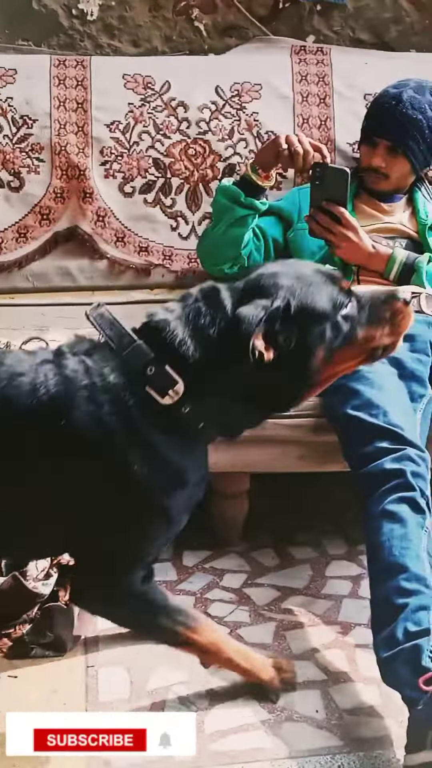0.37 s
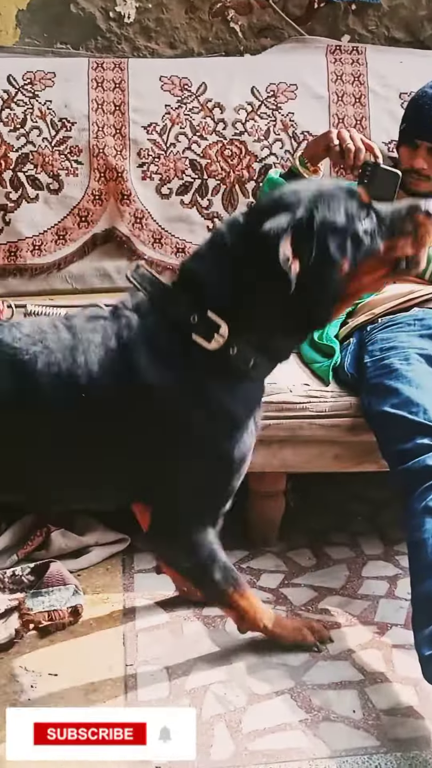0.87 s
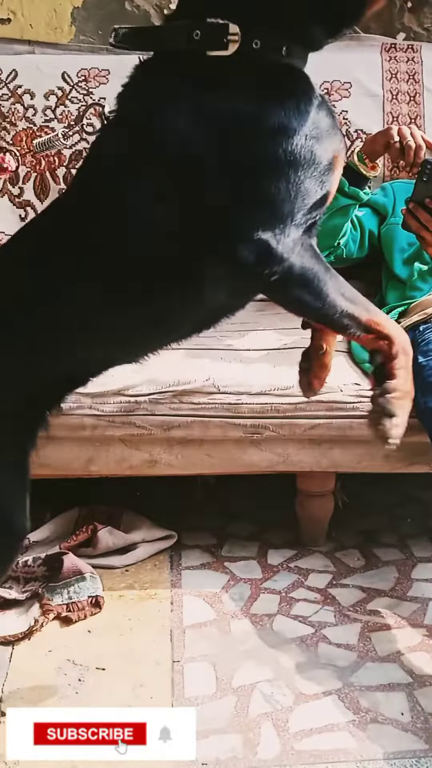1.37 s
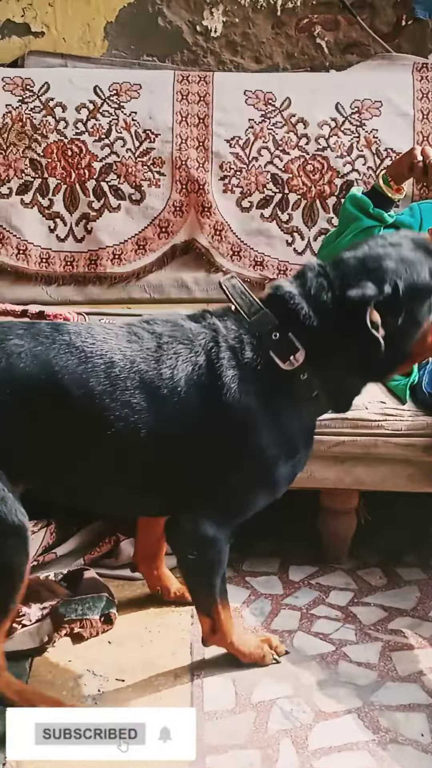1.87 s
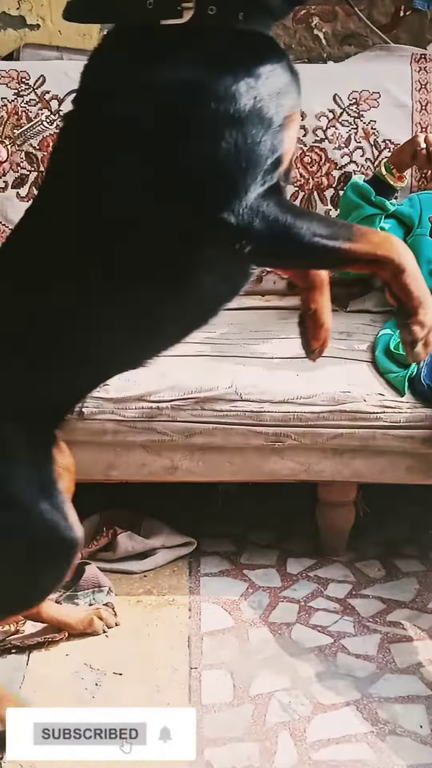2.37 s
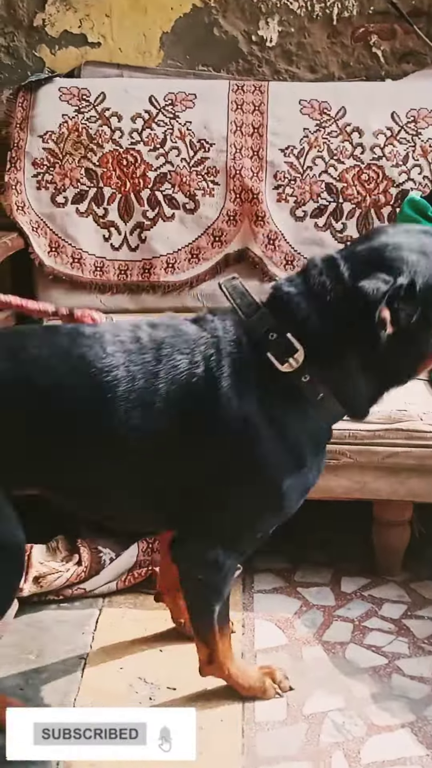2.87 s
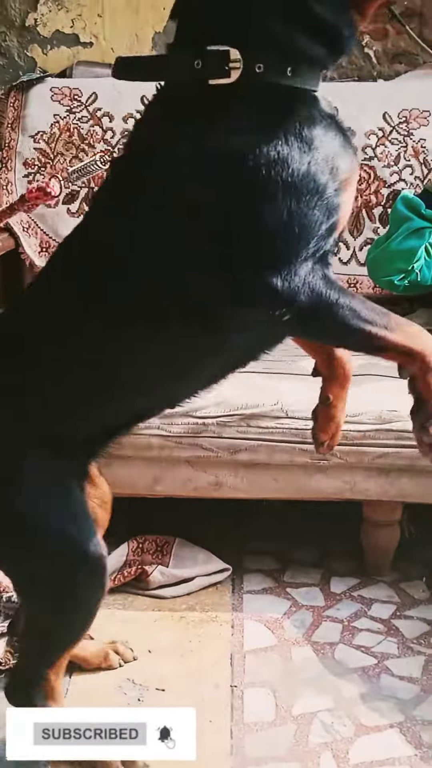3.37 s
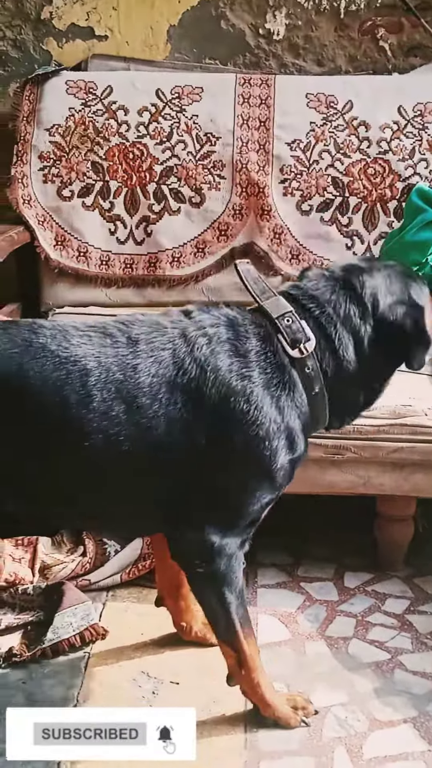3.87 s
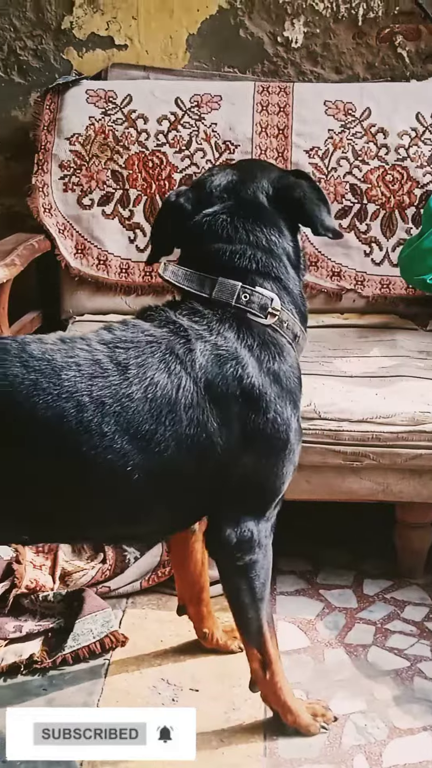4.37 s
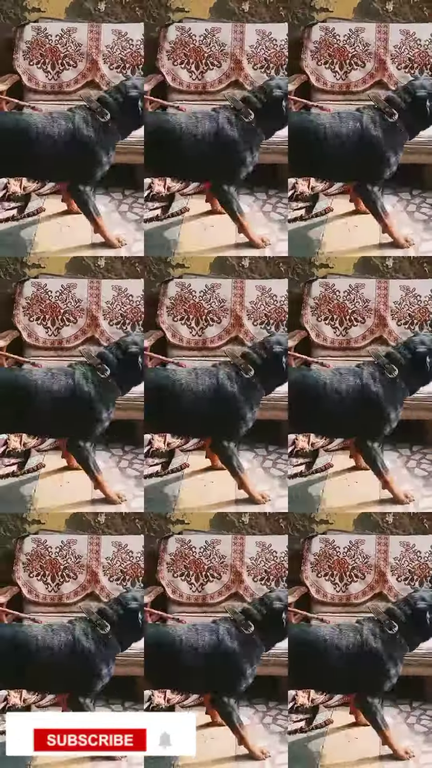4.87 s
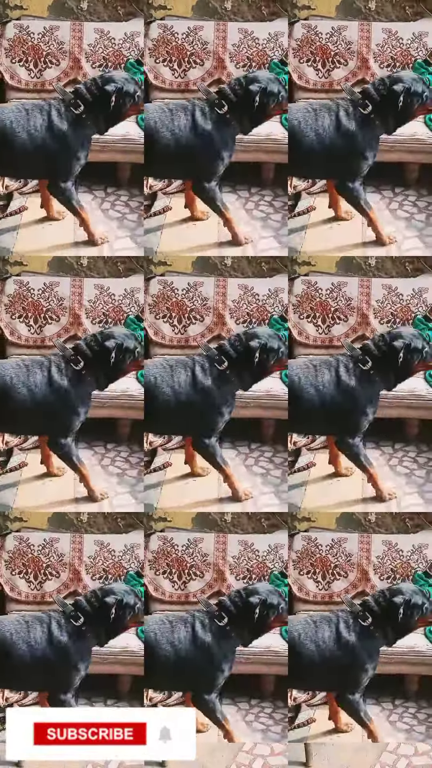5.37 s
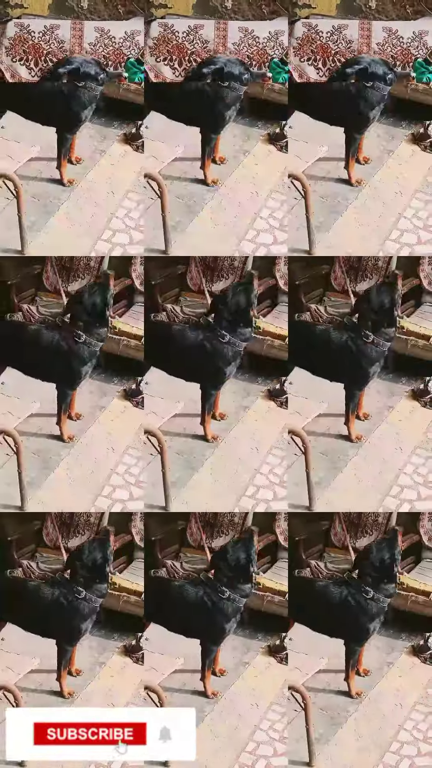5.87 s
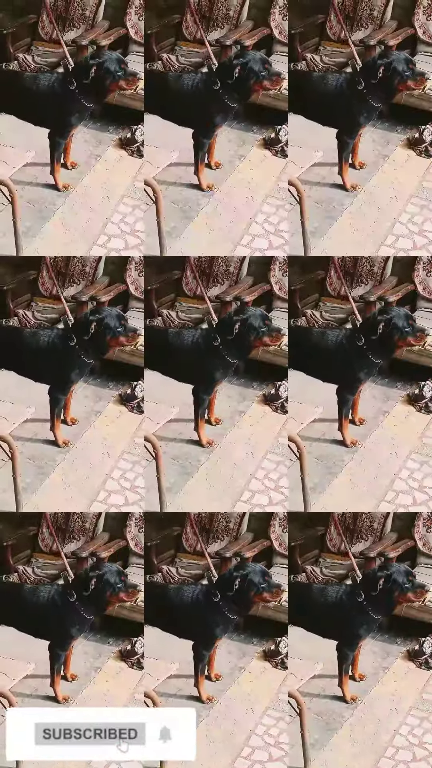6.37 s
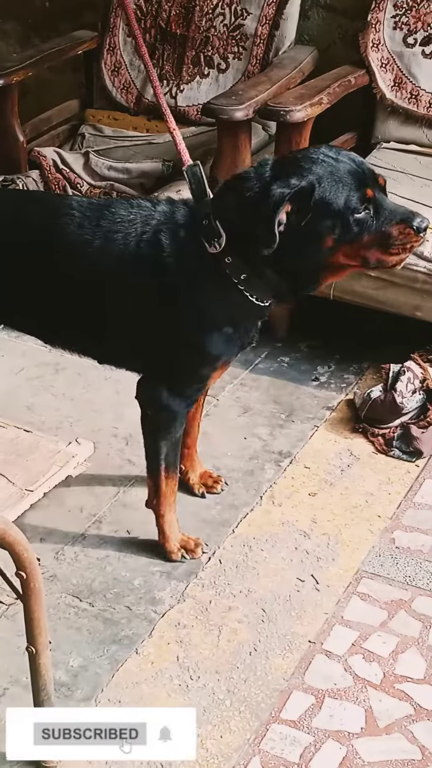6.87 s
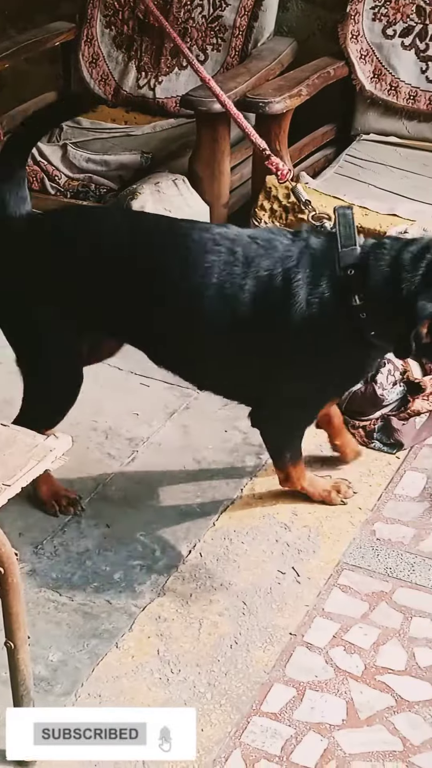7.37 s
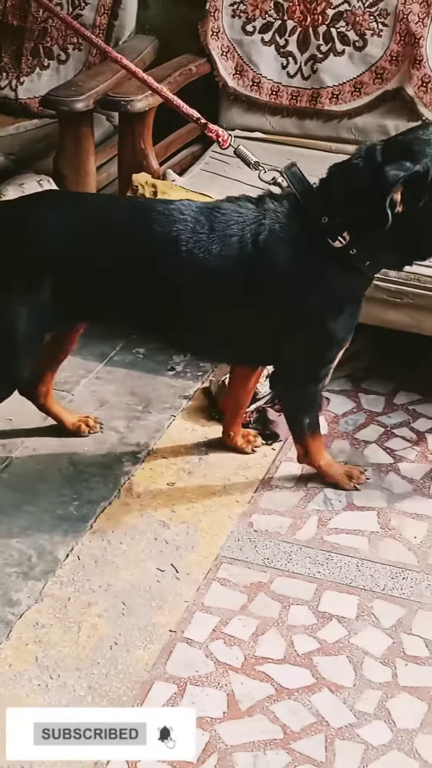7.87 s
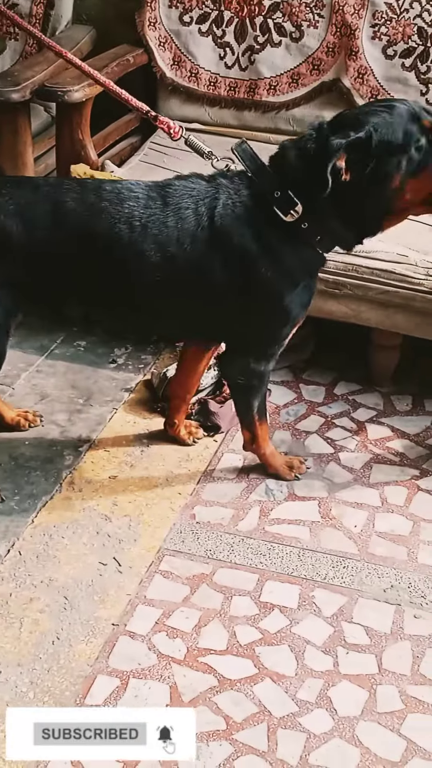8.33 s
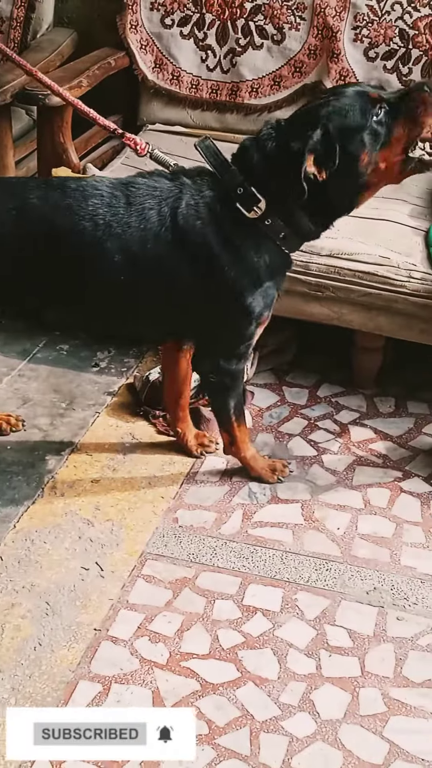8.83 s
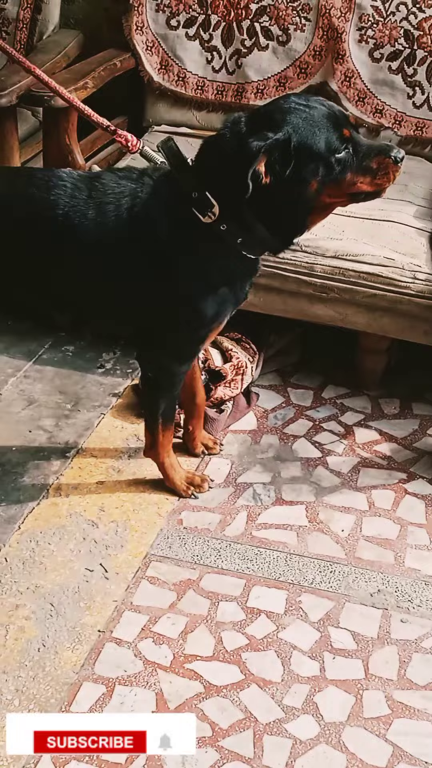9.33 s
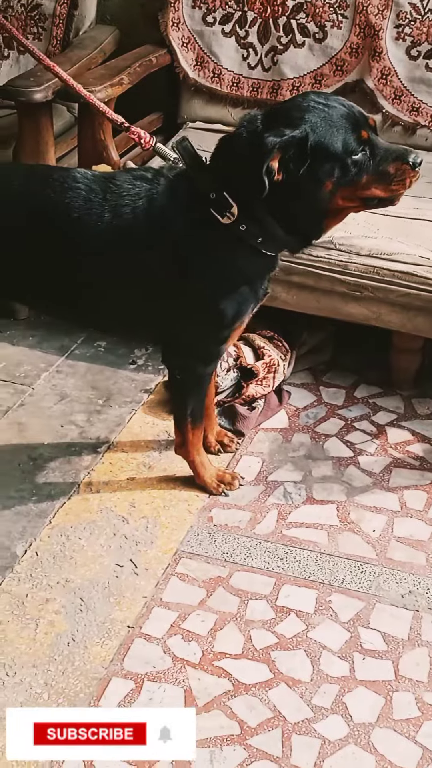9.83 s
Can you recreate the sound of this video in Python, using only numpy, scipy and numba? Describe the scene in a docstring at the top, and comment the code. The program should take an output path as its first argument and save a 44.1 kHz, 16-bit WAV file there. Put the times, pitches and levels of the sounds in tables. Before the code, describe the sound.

A large dog barks hoarsely in rapid runs, growling low between barks while its lead clip rattles in a hard-walled courtyard.

```python
"""Dog barking in a walled yard

A large dog on a lead barks in runs and growls low between the barks, over quiet outdoor air and far chirps.
Rough vocal pulses ring moving throat resonances, and breath hisses past the teeth.
The metal clip of the lead rattles in dying bursts of contacts, paws land on stone as dull puffs of noise,
and the walls answer with single echoes and scattered tails."""
import sys
import numpy as np
from scipy import signal
from scipy.fft import rfft, irfft
from scipy.io import wavfile
from scipy.ndimage import uniform_filter1d, minimum_filter1d
from numba import njit

SR = 44100
rng = np.random.default_rng(int(sys.argv[2]) if len(sys.argv) > 2 else 0)


def to_wav(s):
    """Save 16-bit WAV."""
    ch = np.atleast_2d(s).T  # columns
    pcm = np.round(np.clip(ch, -1, 1) * 32767)  # PCM
    wavfile.write(sys.argv[1], SR, pcm.astype(np.int16))


def level_to_linear(level):
    """Convert decibel levels to linear amplitude factors, elementwise."""
    exponent = np.asarray(level, float) / 20
    return 10 ** exponent


N = 439677   # length in samples


def rms_one(x):
    """Power normalisation: scale to unit rms."""
    return x / np.sqrt(np.mean(x ** 2) + 1e-20)


def evened(x, window=.025):
    """Envelope flattening: bring the short-time rms, over a window in s, to 1."""
    return x / np.sqrt(uniform_filter1d(x ** 2, int(window * SR)) + 1e-12)


def drift(hz):
    """Low-passed chance: slow random motion of unit spread, drawn at every tenth sample."""
    r = np.exp(-20 * np.pi * hz / SR)
    settling = 2000
    draws = rng.standard_normal(N // 10 + settling + 2)
    slow = signal.lfilter([1], [1, -2 * r, r * r], draws)[settling:]
    return np.interp(np.arange(N) / 10, np.arange(len(slow)), rms_one(slow))


def filtered(x, order, hz, kind="low"):
    """Butterworth filtering: a flat passband and a smooth roll-off."""
    return signal.sosfilt(signal.butter(order, hz, kind, fs=SR, output="sos"), x)


@njit
def resonate(x, cosine, r):
    """Two-pole resonance of gain 1 whose centre and width may move sample by sample."""
    y = np.zeros(len(x))
    for i in range(2, len(x)):
        drive = (1 - r[i] ** 2) / 2 * (x[i] - x[i - 2])
        y[i] = drive + 2 * r[i] * cosine[i] * y[i - 1] - r[i] ** 2 * y[i - 2]
    return y


def resonance(x, hz, *widths_hz):
    """Resonance at a fixed or moving frequency: one pass in series for each width."""
    ones = np.ones(len(x))
    for width_hz in widths_hz:
        x = resonate(x + 1e-18, np.cos(2 * np.pi * hz / SR) * ones, np.exp(-np.pi * width_hz / SR) * ones)
    return x


def coloured(spectrum):
    """Spectral shaping: noise with the given spectrum, rms 1."""
    hz, db = np.transpose(spectrum)
    bins = np.fft.rfftfreq(N, 1 / SR) + 1
    gain = level_to_linear(np.interp(np.log(bins), np.log(hz), db))
    return rms_one(irfft(rfft(rng.standard_normal(N)) * gain, N))


def latest(rows, *lists):
    """Event lookup: time since the latest event began, and the columns of that event."""
    table = np.column_stack([rows, *lists])
    t = np.arange(N) / SR
    columns = table[np.maximum(np.searchsorted(table[:, 0], t) - 1, 0)].T
    return np.maximum(t - columns[0], 0), columns[1:]


def in_time(rows):
    """Linear interpolation: columns joined by straight lines in time."""
    s, *columns = np.transpose(rows)
    return [np.interp(np.arange(N) / SR, s, c) for c in columns]


# spectrum of the outdoor air: frequency_hz, relative_db
AIR_SPECTRUM = [(24, -38.5), (40, -18), (75, 4), (154, 1), (606, -9), (1820, -15.5), (2500, -27.5),
                (3100, -19), (3700, -22.5), (7000, -18.5), (9000, -27.5), (13000, -27.5), (15500, -16.5)]


def outdoor_air():
    """Air absorption: steady coloured noise, dulled by distance."""
    return filtered(level_to_linear(-65.5) * coloured(AIR_SPECTRUM), 2, 5500)


# faint far chirps: start_s, length_s, pitch_hz, level_db
FAR_CHIRPS = [(3.3, 0.25, 2680, -74), (5.193, 0.14, 1810, -59), (5.2, 0.11, 2170, -67),
              (5.207, .08, 3000, -69), (6.765, 0.24, 3055, -85), (9.328, 0.41, 3136, -81),
              (9.55, 0.25, 2150, -80.5), (9.771, 0.17, 3130, -79.5)]


def chirps():
    """Narrow-band noise: thin wavering whistles from far off, each under a half-sine swell."""
    out, t, noise = 0, np.arange(N) / SR, rng.standard_normal(N)
    for start, length, hz, db in FAR_CHIRPS:
        whistle = rms_one(resonance(noise, hz, 64, 64))
        out = out + level_to_linear(db) * np.sin(np.pi * np.clip((t - start) / length, 0, 1)) * whistle
    return out


# single reflections from the walls: delay_s, level_db
ECHOES = [(0.037, -11), (0.069, -23), (0.12, -23), (.16, -21)]
# scattered tails, near walls then far buildings: t60_s, level_db, dulled_above_hz
TAILS = [(0.421, -5.5, 3000), (1.496, -28, 1133)]


def yard(x):
    """Reverberation as convolution: a few single echoes, then two dull tails of scattered reflections."""
    t = np.arange(2 * SR) / SR
    answer = np.zeros(len(t))
    for delay, db in ECHOES:
        answer[round(delay * SR)] = level_to_linear(db)
    answer = signal.lfilter([.5], [1, -.5], answer)   # the echoes lose treble
    for t60, db, dull_hz in TAILS:
        build_up = 1 - np.exp(-t / 0.00073)
        tail = filtered(rng.standard_normal(len(t)) * level_to_linear(-60 * t / t60) * build_up, 1, dull_hz)
        answer += level_to_linear(db) * tail / np.sqrt(np.sum(tail ** 2))   # level set by energy
    return signal.fftconvolve(x, answer)[:N]


# paws on stone: start_s, level_db, centre_hz
PAW_STEPS = [(3.339, -58, 382.9), (3.433, -50.5, 367.3), (3.532, -50.5, 372), (8.115, -63, 324),
             (9.76, -66, 312)]


def paws():
    """Damped impact: a soft pad gives a short dull puff of noise."""
    out, t = np.zeros(N + SR), np.arange(SR // 4) / SR
    for start, db, hz in PAW_STEPS:
        puff = rms_one(resonance(rng.standard_normal(len(t)), hz, 140, 300))
        envelope = level_to_linear(db - 60 * t / 0.29) * np.clip(t / 0.0012, 0, 1)
        out[round(start * SR):][:len(t)] += envelope * puff
    return out[:N]


KNOCKS = [(0.4664, -29.5, 0.14), (1.576, -41.5, 0.11), (1.595, -49, 0.11), (1.634, -30, 0.27),
          (1.7518, -35.5, 0.067), (1.757, -34.5, 0.089), (2.476, -33, 0.13), (2.786, -35, 0.063),
          (2.8077, -24, 0.05), (2.837, -36, 0.08), (3.076, -39.5, 0.068), (3.094, -48, 0.2),
          (3.12, -53.5, .05), (3.168, -47, 0.045), (3.432, -51, 0.1), (3.457, -53.5, 0.1),
          (3.487, -52, .08), (3.533, -48, 0.31), (3.619, -38.5, 0.044), (3.6839, -46, 0.094),
          (4.989, -33.5, 0.09), (5.2, -59, 0.56), (5.259, -62.5, 0.11), (7.412, -45, 0.2),
          (7.496, -44, 0.17), (7.5993, -44, 0.083)]
CLIP_RINGS = [(2150, 1200, -7), (3800, 1400, -5.5), (5800, 950, 2), (6730, 110, 1.5), (8800, 700, -12.5)]


def lead_clip():
    """Modal excitation: each knock is a dying burst of tiny contacts through the broad clip resonances."""
    shape, t = np.zeros(N + SR), np.arange(SR // 2) / SR
    for start, db, t60 in KNOCKS:
        shape[round(start * SR):][:len(t)] += level_to_linear(db - 60 * t / t60) * np.clip(t / .006, 0, 1)
    contacts = shape[:N] * rng.standard_normal(N) * level_to_linear(drift(300))
    body = sum(level_to_linear(db) * resonance(contacts, hz, width, 2 * width) for hz, width, db in CLIP_RINGS)
    return body + level_to_linear(-24) * resonance(contacts, 14000, 5000)


# broad hiss spectrum: frequency_hz, relative_db
HISS_SPECTRUM = [(1530, -37.5), (2600, -42), (2950, -16.5), (3700, -16.5), (4820, -2), (6270, 10),
                 (7070, -1.5), (8280, -13.5), (9200, -15), (13500, -33), (15700, -22)]
# narrow hiss resonances at the teeth: centre_hz, width_hz, relative_db
TEETH_RINGS = [(3000, 35, -15.5), (4930, 170, -4.5), (5540, 260, -2.5), (6890, 230, -6.5)]


def breath():
    """Turbulence at the teeth: broad hiss plus wandering resonances that flicker on their own, rms 1."""
    hiss, noise = coloured(HISS_SPECTRUM), rng.standard_normal(N)
    for hz, width_hz, db in TEETH_RINGS:
        moving_hz = hz * (1 + .05 * drift(12))
        flicker = level_to_linear(db - 5 + 6 * drift(25))
        hiss = hiss + flicker * rms_one(resonance(noise, moving_hz, width_hz, width_hz))
    return rms_one(hiss)


def folds(pitch, hoarse):
    """Glottal source: one pulse per closure, uneven in time and strength, with noise on each cycle."""
    cycles = np.cumsum(pitch * (1 + .06 * hoarse * drift(50))) / SR
    pulses = np.diff(np.floor(cycles), prepend=0) * level_to_linear(8 * hoarse * drift(80))
    opening = .5 + .5 * np.cos(2 * np.pi * cycles)
    noise = opening * rng.standard_normal(N)
    return np.sqrt(1 - hoarse ** 2) * evened(pulses, window=.05) + hoarse * rms_one(noise), opening


# growls: start_s, length_s, starting_level_db, starting_pulses_per_s, fade_db_per_s
GROWL_EVENTS = [(2.75, .52, -36.5, 61, 36), (5.44, 0.63, -52.5, 60, 24), (6.43, 0.2, -61.5, 70, 34),
                (7.28, 0.23, -45.5, 60.5, 25), (7.49, 0.32, -38, 60, 64), (8.56, .2, -44.5, 57, 22),
                (8.95, 0.52, -48, 61, 21.5)]
# hoarseness of each growl: hoarseness (0-1)
GROWL_ROUGHNESS = [.55, .6, .5, .5, .5, .4, .4]
# resonances of the closed mouth: centre_hz, width_hz, gain_db
CLOSED_MOUTH = [(118, 31, 16.5), (220, 300, 12.5), (370, 160, 21), (700, 310, -19.5)]


def growls(breath_hiss):
    """Source and filter: slow separate pulses ring a closed mouth, fading and slowing."""
    edge_s, slowing_per_s, hiss_db = 0.026, 0.24, -20.5   # slowing as a share of the starting rate
    since, (length, db, rate, fade_db, hoarse) = latest(GROWL_EVENTS, GROWL_ROUGHNESS)
    level = np.clip(np.minimum(since, length - since) / edge_s, 0, 1) * level_to_linear(db - fade_db * since)
    source, _ = folds(rate * (1 - slowing_per_s * np.minimum(since, length)), hoarse)
    voice = sum(level_to_linear(gain) * resonance(source, hz, width) for hz, width, gain in CLOSED_MOUTH)
    voice = evened(filtered(voice, 2, [68, 900], "band"), window=.08)
    return level * (voice + level_to_linear(hiss_db) * breath_hiss)


# the jaw while each bark is held, one table a bark:
# time_s, held_level_db (before distance), mouth_hz, mouth_over_throat_db, muzzle_hz, muzzle_over_throat_db
JAW_PATHS = [
    [(0.04, -14.5, 937, -11, 1480, -16.5), (0.082, -15.5, 890.6, -12, 1530, -11.5),
     (0.112, -22.5, 864, 2.5, 1470, -7), (0.184, -26, 860.5, -10, 1259, -12),
     (0.19, -14.5, 837.2, -9, 1330, -21.5)],
    [(0.26, -23, 778.7, -12, 1359, -10.5), (0.29, -14.5, 708, -16.5, 1317, -8),
     (0.348, -5.5, 735, -10.5, 1320, -22.5), (0.366, -18, 763.8, -3, 1274, -15),
     (0.44, -19, 733.7, -15, 1350, -29)],
    [(0.48, -26, 747.2, 2.5, 1386, 0.5), (0.52, -18, 715.6, 2, 1390, -10),
     (0.588, -16, 719.2, -7, 1360, -16.5), (0.626, -29, 743.3, 4.5, 1307, -5),
     (0.66, -16, 717, -6, 1395, -17)],
    [(0.73, -19, 744, -11, 1242, -16.5), (0.798, -7.5, 735.6, -28, 1366, -20),
     (0.83, -17, 684.3, 0.5, 1490, -21), (0.884, -23, 728, -7, 1328, -15.5),
     (0.92, -15, 735, -24, 1315, -24.5)],
    [(1.0, -21, 712, -5.5, 1414, -9.5), (1.032, -17.5, 698.6, -2, 1377, -12.5),
     (1.068, -16, 713, 6.5, 1503, -8), (1.114, -25, 720.5, -9, 1370, -13.5),
     (1.15, -25.5, 691.8, 2, 1370, -10)],
    [(1.255, -13.5, 782, -16, 1453, -16), (1.281, -15.5, 840.4, -12, 1455, -9.5),
     (1.325, -15, 882.7, -7.5, 1505, -8), (1.369, -22.5, 886, -9.5, 1578, -20.5),
     (1.39, -24.5, 819.7, -17, 1547, -15.5)],
    [(1.89, -19, 803.4, -3, 1546, -2.5), (1.946, -15.5, 711.4, 8, 1425, -11),
     (1.974, -8.5, 716.7, -3, 1357, -13), (2.066, -38, 719.5, 4, 1300, -7),
     (2.08, -20, 733.8, -6, 1403, -17.5)],
    [(2.18, -18.5, 763, -10.5, 1530, -19), (2.246, -17, 755.7, 0.5, 1497, -11.5),
     (2.292, -16.5, 760, -22.5, 1288, -16), (2.392, -20, 763.7, -19, 1330, -19),
     (2.43, -19, 739.3, -8.5, 1416, -33)],
    [(2.49, -14, 769.2, -17, 1285, -24), (2.53, -9, 726.8, -14.5, 1383, -27),
     (2.566, -8, 716.6, -0.5, 1433, -17.5), (2.582, -11.5, 714.5, -5, 1430, -15),
     (2.68, -27, 728, -1, 1353, -17)],
    [(2.83, -27.5, 739, -12, 1286, -17.5), (2.85, -18.5, 750, -4.5, 1354, -10),
     (2.882, -22, 739.5, -5.5, 1325, -7.5), (2.958, -30.5, 830.4, -19.5, 1308, -26),
     (2.97, -41, 823, -20.5, 1390, -28)],
    [(3.74, -18, 688.6, -11.5, 1398, -16), (3.76, -18, 682, 5, 1410, -2.5),
     (3.824, -16, 690.6, 1, 1317, -11), (3.89, -21.5, 688, -2.5, 1526, -7),
     (3.99, -25, 722, -1, 1520, -18.5)],
    [(4.7, -17.5, 701, -6.5, 1370, -12.5), (4.742, -21.5, 710, 3, 1360, -15),
     (4.766, -19.5, 719, 5.5, 1350, 0), (4.788, -16.5, 728, 0, 1320, -6.5),
     (4.94, -29, 687, 2, 1220, -14.5)],
    [(5.32, -42.5, 744, 5, 1593, -2), (5.46, -29, 800, -2.5, 1433, -8.5), (5.56, -45, 800, 8.5, 1574, -7.5)],
    [(6.1, -28, 857, -3.5, 1510, -11), (6.122, -25, 754, -3.5, 1560, 0.5),
     (6.158, -17.5, 642, -7.5, 1577, -16), (6.19, -21.5, 672, 5, 1643, -9.5),
     (6.24, -31, 648, 2.5, 1544, -30)],
    [(7.075, -24.5, 813, -9.5, 1520, -6), (7.12, -15, 799, -1, 1531, -2),
     (7.186, -14.5, 749, -3.5, 1464, -14), (7.25, -29.5, 818, 9, 1350, -3), (7.28, -24, 789, 2.5, 1354, -7)],
    [(7.55, -30, 664, -4, 1362, -8.5), (7.588, -28.5, 676, -23, 1490, -7.5),
     (7.608, -34.5, 727, 7.5, 1510, -9.5), (7.628, -35, 731, -11.5, 1500, -31.5),
     (7.66, -38, 719, -9.5, 1556, -29)],
    [(8.41, -20.5, 842, -1, 1590, 2.5), (8.432, -15, 780, 0, 1430, -8), (8.548, -23, 759, -0.5, 1290, -5),
     (8.562, -20, 743, -2.5, 1385, -21), (8.58, -27.5, 739, 5.5, 1320, 1.5)],
    [(8.79, -23.5, 800, 1.5, 1616, -9), (8.814, -18.5, 770, 1.5, 1600, -4.5),
     (8.868, -19, 760, 4.5, 1590, -9), (8.886, -19.5, 780, -6.5, 1340, -5), (9.0, -25, 735, 0, 1361, -5.5)],
]


def effort():
    """Amplitude envelope: each bark swells late, follows its held level and is let go."""
    swell_power, release_db_per_s, flutter_db, distance_loss_db = 4.2, 167, 2, 6
    out, t = np.zeros(N + SR), np.arange(SR) / SR
    for (start, *_), rows in zip(BARK_EVENTS, JAW_PATHS):
        s, db = np.transpose(rows)[:2] - [[start], [0]]
        held_db = np.interp(t, s, db) - release_db_per_s * np.maximum(t - s[-1], 0)
        swell = np.sin(np.pi / 2 * np.clip(t / s[0], 0, 1)) ** swell_power
        out[round(start * SR):][:SR] += swell * level_to_linear(held_db)
    return out[:N] * level_to_linear(flutter_db * drift(18) - distance_loss_db)


# clear tone of the folds: multiple of the throat frequency, mean_level_db
TONE_PARTIALS = [(1, 0.5), (3.0, -18.5), (4.0, -28)]


def tone(throat_hz):
    """Additive synthesis: while the folds run evenly they sing a gliding harmonic tone."""
    turns = np.cumsum(throat_hz * (1 + .022 * drift(25))) / SR
    partials = [level_to_linear(db + 3.5 * drift(31)) * np.sin(2 * np.pi * round(k) * turns) for k, db in TONE_PARTIALS]
    return np.sqrt(2) * sum(partials)


def bark_hiss(level, hiss_db, rasp_db, opening, breath_hiss):
    """Turbulent flow: breath hiss and a low rasp, pulsed by the folds, build up after the voice."""
    bloom_s, smooth_s = 0.016, .07
    lag = np.exp(-1 / (bloom_s * SR))
    push = np.minimum(2 * level, uniform_filter1d(level, round(smooth_s * SR)))
    flow = signal.lfilter([1 - lag], [1, -lag], push * level_to_linear(hiss_db))
    rasp = level_to_linear(rasp_db) * rms_one(resonance(rng.standard_normal(N), 4590, 1400, 1400))
    sizzle = level_to_linear(rasp_db - 13.5) * rms_one(resonance(rng.standard_normal(N), 10000, 4000))   # top of the rasp
    return flow * (1.69 + opening) * level_to_linear(2 * drift(55)) * (breath_hiss + rasp + sizzle)


def chest(level):
    """Body radiation: the chest moves as a bark starts and stops, heard as low noise."""
    smooth_level = uniform_filter1d(level, SR // 30, origin=SR // 80)
    heave = np.abs(np.gradient(smooth_level)) * SR / 20
    return level_to_linear(-31.5) * heave * rms_one(resonance(rng.standard_normal(N), 160, 100))


def grunt(level, age, throat_hz, full, grunt_db):
    """Gliding resonance: the half-closed mouth rings low, arching between two shares of the throat frequency."""
    low_share, top_share, arch_s = .58, 0.789, .24
    arch = np.sin(np.pi * np.clip(age / arch_s, 0, 1))
    grunt_hz = throat_hz * (low_share + (top_share - low_share) * arch)
    ring = resonance(full + rng.standard_normal(N), grunt_hz, 80, 110, 120)
    return level * level_to_linear(grunt_db) * evened(filtered(ring, 6, 225, "high"), window=0.087)


# barks: start_s, starting_hiss_db, upper_over_muzzle_db
BARK_EVENTS = [(0.008, -20.5, -1), (0.202, -26, -15), (0.444, -22, -12.5), (0.692, -28.5, -12),
               (0.954, -23.5, -18), (1.209, -26.5, -20.5), (1.858, -24.5, -15.5), (2.14, -27, -19),
               (2.46, -31, -18), (2.788, -23.5, -8), (3.707, -23.5, -23), (4.667, -23.5, -15),
               (5.275, -26.5, -17), (6.04, -30.5, -9.5), (7.011, -25.5, -12), (7.511, -36, -6),
               (8.381, -23, -17.5), (8.754, -24.5, -21.5)]
# one value per bark: low rasp over the hiss, rasp_db
BARK_RASP = [-13.5, -13.5, -17.5, -21, -23.5, -22.5, -16.5, -14, -13.5, -17, -17.5, -19, -12, -9, -3, 9.5,
             -10, -10.5]
# one value per bark: low ring over the throat, grunt_db
BARK_GRUNT = [-14.5, -16, -14.5, -16, -14, -16.5, -16.5, -15.5, -16, -10, -20.5, -13, -10, -7.5, -4, -8.5,
              -2, -3.5]
# one value per bark: hoarseness (0-1)
BARK_HOARSENESS = [.42, .36, .42, .25, .34, .44, .45, .45, .32, .4, .55, .62, .9, .6, .6, .7, .58, .56]
# one value per bark: power share of a second, higher vibration of the folds, at the mouth resonance (0-1)
SECOND_VIBRATION = [.3, .15, .3, .25, .35, .15, .25, .1, .4, .5, .15, .1, 0, 0, 0, 0, 0, 0]
# voice, arching up as the jaw opens, then sagging: time_s, pitch_hz, throat_hz
VOICE_PATH = [(0.021, 186.6, 357.3), (0.088, 226.4, 475.3), (0.209, 208.2, 409.5), (0.24, 199.8, 386.8),
              (0.32, 249.2, 514.4), (0.439, 243.2, 488.9), (0.468, 215, 430), (0.56, 255.6, 543),
              (0.678, 243.3, 492), (0.715, 177.2, 345), (0.75, 215, 430), (0.8, 241.3, 494.5),
              (0.945, 238.6, 496), (0.975, 184.7, 367), (1.045, 234.2, 473), (1.191, 226, 429),
              (1.235, 169.9, 343.4), (1.29, 211.6, 416), (1.461, 189.1, 375.8), (1.87, 176.8, 345),
              (1.91, 202.3, 413), (1.96, 270.3, 550.7), (2.02, 238.6, 482.8), (2.121, 237.5, 474),
              (2.15, 185.5, 376.8), (2.25, 244.4, 479), (2.421, 227.2, 443), (2.46, 160, 308.9),
              (2.515, 198.8, 400.9), (2.575, 237.9, 475.7), (2.64, 227.9, 452.5), (2.75, 199.2, 400),
              (2.801, 191.5, 381.3), (2.889, 175.8, 337.9), (3.059, 172, 335), (3.72, 199.8, 400.1),
              (3.77, 250.9, 505), (4.101, 243.7, 461), (4.669, 204.2, 407.6), (4.71, 248.1, 520.7),
              (5.079, 221.9, 494.5), (5.3, 199.9, 595), (5.42, 216.4, 576), (5.68, 211.9, 543.8),
              (6.061, 258.2, 455.6), (6.16, 314.9, 625.2), (6.38, 312.2, 569.5), (7.03, 197.8, 440.5),
              (7.12, 204.8, 600.5), (7.45, 194.7, 540.2), (7.52, 205.4, 474), (7.589, 210.6, 494.7),
              (7.781, 188.8, 447.4), (8.39, 188.3, 530), (8.46, 196.9, 598), (8.72, 183.4, 520),
              (8.77, 184.9, 544.7), (8.85, 199.2, 595.3), (9.15, 189.6, 521)]
# resonances above the muzzle: centre_hz, width_hz, gain_db
UPPER_RINGS = [(2164, 240, -3.5), (3330, 360, -3.5)]


def barks(breath_hiss):
    """Source and filter: two low resonances carry the bark, the muzzle its edge, the teeth its hiss."""
    since, (hiss_db, upper_db, rasp_db, grunt_db, hoarse, second) = latest(
        BARK_EVENTS, BARK_RASP, BARK_GRUNT, BARK_HOARSENESS, SECOND_VIBRATION)
    _, mouth_hz, mouth_db, muzzle_hz, muzzle_db = in_time(np.concatenate(JAW_PATHS))
    pitch, throat_hz = in_time(VOICE_PATH)
    level, age = effort(), np.minimum(since, .4)
    mouth_db = mouth_db + 2.5 * drift(6.3)   # the balance wavers
    muzzle_db = muzzle_db + 2.5 * drift(16)
    hiss_db = hiss_db - 36.5 * age   # the hiss fades through the bark

    full, opening = folds(pitch, hoarse)
    source = filtered(full, 8, 330, "high")   # an open mouth radiates no bass
    high = np.sqrt(1 - second) * source + np.sqrt(second) * folds(mouth_hz, hoarse)[0]
    airy = high + .6 * rms_one(opening * rng.standard_normal(N))   # air roughens the upper tones

    wide = 1 + 1.8 * hoarse ** 2   # rough air blurs the resonances
    throat = resonance(source, throat_hz, wide * 89.6, 2 * wide * 89.6)
    mouth = resonance(high, mouth_hz, wide * 115, 2 * wide * 115)
    muzzle = resonance(airy, muzzle_hz, 200, 640)
    upper = sum(level_to_linear(db) * resonance(airy, hz, width, width) for hz, width, db in UPPER_RINGS)
    edge = evened(muzzle) - level_to_linear(uniform_filter1d(upper_db, SR // 30)) * evened(upper)
    edge = filtered(edge, 8, 2330)

    clear = np.clip(1 - (hoarse / .62) ** 2, 0, 1)   # clear tone only below this hoarseness
    voice = np.sqrt(1 - clear) * evened(throat) + np.sqrt(clear) * tone(throat_hz)
    voice = voice - level_to_linear(mouth_db) * evened(mouth) + level_to_linear(muzzle_db) * edge
    hiss = bark_hiss(level, hiss_db, rasp_db, opening, breath_hiss)
    return level * voice + hiss + chest(level) + grunt(level, age, throat_hz, full, grunt_db)


def scene():
    """Superposition: the dog and its lead in the yard, over quiet outdoor air."""
    hiss = breath()
    dog = barks(hiss) + growls(hiss) + lead_clip() + paws()
    return (dog + yard(dog) + outdoor_air() + chirps())[None]


def band_limit(x):
    """A steep low-pass at the top of the band."""
    return signal.sosfilt(signal.butter(12, 15910, fs=SR, output="sos"), x)


def record(dry):
    """Gain limiting: a fast limiter holds loud barks down; the small microphone loses the deepest bass."""
    top, window_s = .5, .008
    size = round(window_s * SR)
    allowed = minimum_filter1d(top / np.maximum(np.abs(dry), top), size)
    limited = dry * uniform_filter1d(allowed, size)
    mix = filtered(limited, 3, 55, "high")
    return band_limit(mix)


dry = scene()
out = record(dry)
to_wav(out)
```